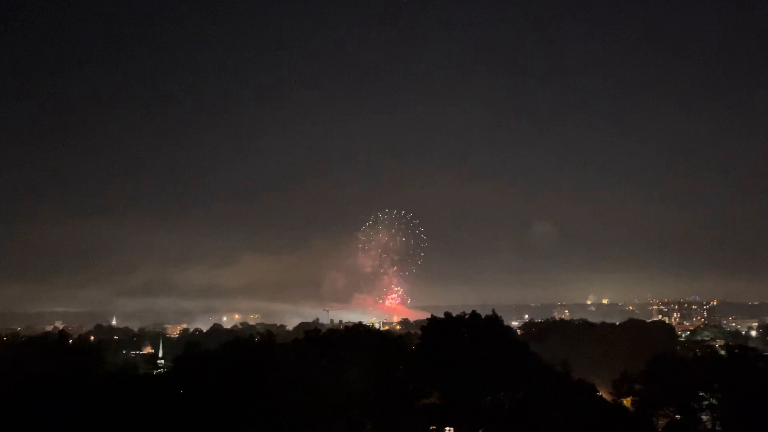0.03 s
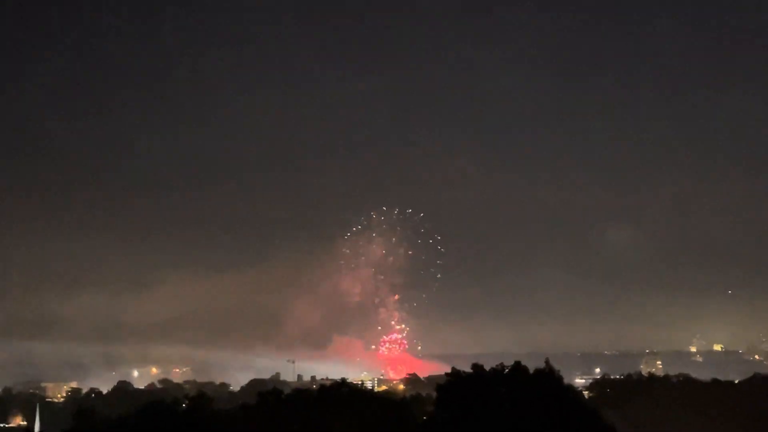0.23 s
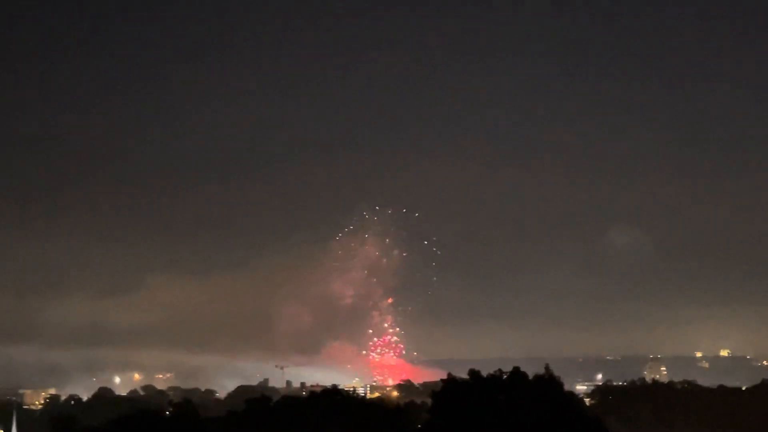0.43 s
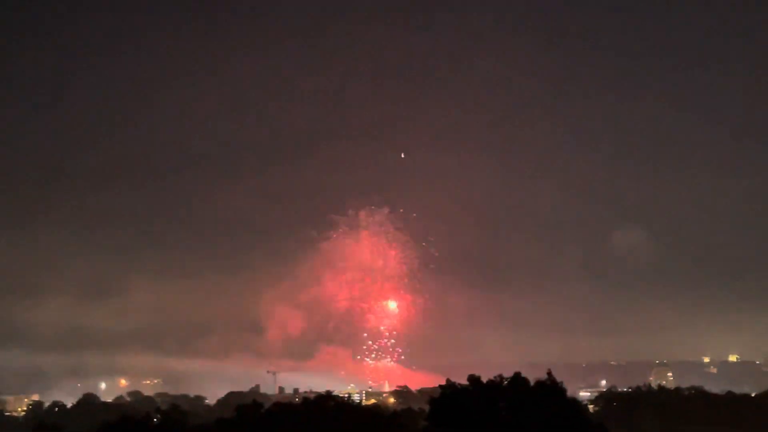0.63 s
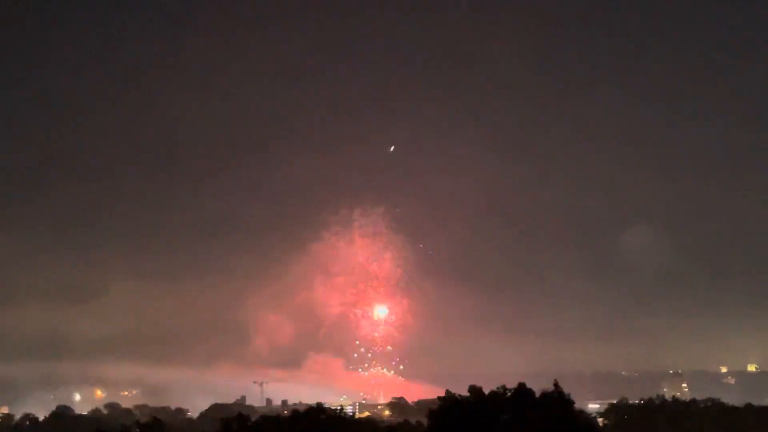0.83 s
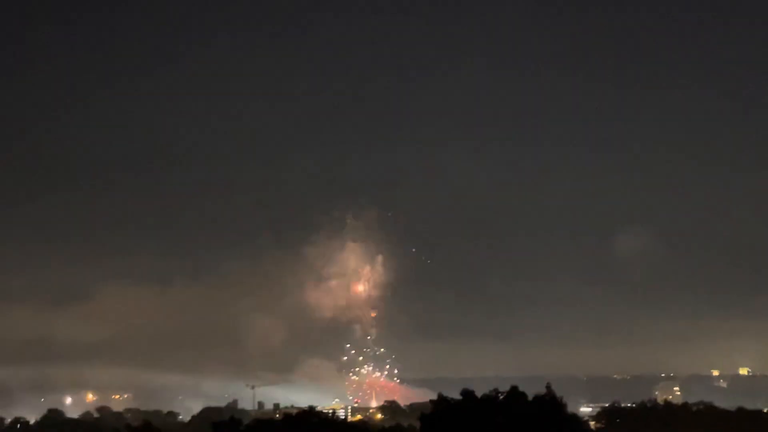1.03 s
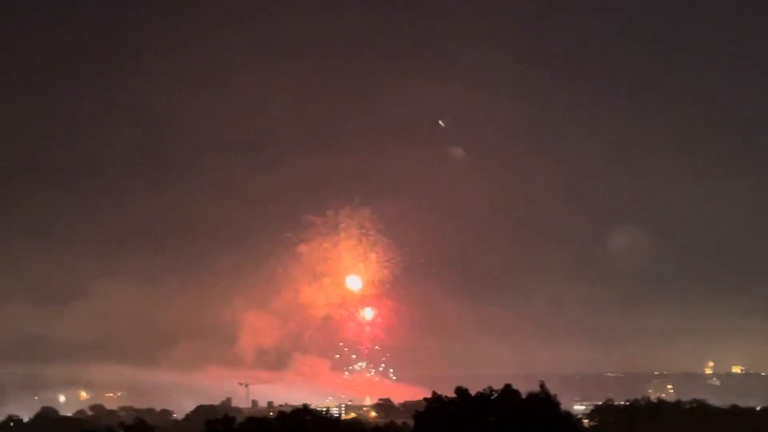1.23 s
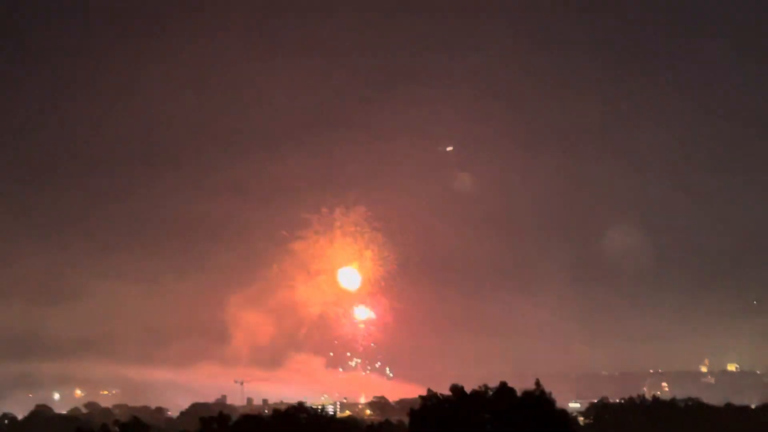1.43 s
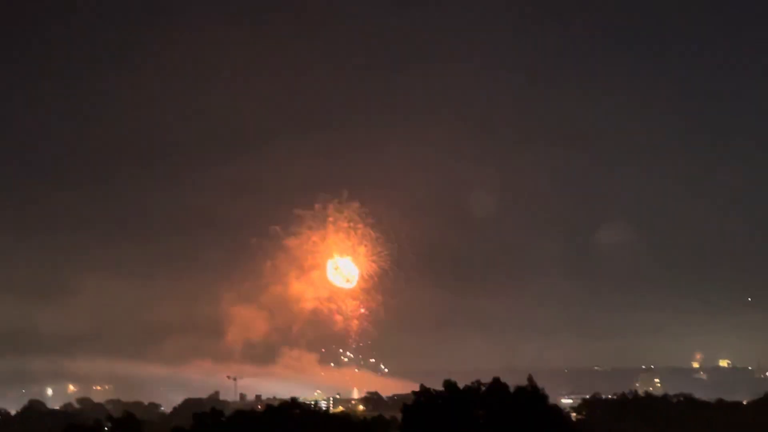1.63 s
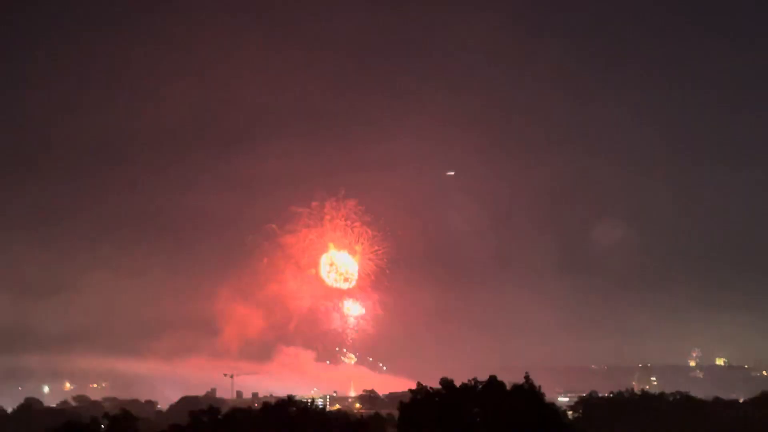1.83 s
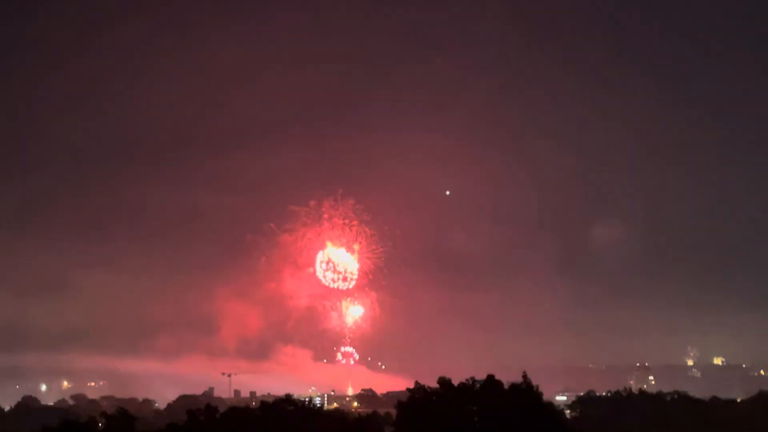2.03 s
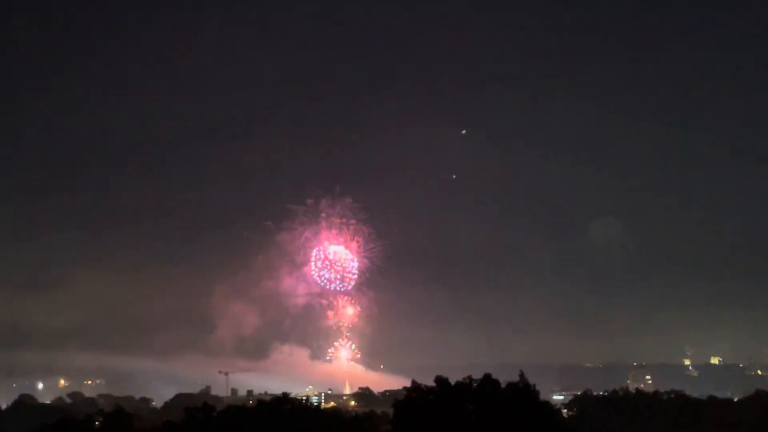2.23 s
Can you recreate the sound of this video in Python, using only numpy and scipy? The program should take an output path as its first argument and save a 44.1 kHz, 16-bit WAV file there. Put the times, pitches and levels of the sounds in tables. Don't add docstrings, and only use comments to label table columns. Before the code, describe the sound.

Distant fireworks outdoors at night: a quiet low rumble, then a rapid cluster of dull bangs, a short gap, one louder blast with quick followers, and deep echoes rolling away. Faint hiss, limited treble, slightly squashed peaks.

```python
import sys
import numpy as np
from scipy import signal
from scipy.fft import rfft, irfft, next_fast_len
from scipy.io import wavfile

SR = 44100
rng = np.random.default_rng(int(sys.argv[2]) if len(sys.argv) > 2 else 0)


def transcribe(signal):
    frames = np.atleast_2d(signal).T
    limited = np.clip(frames, -1, 1)
    pcm = np.round(limited * 32767).astype(np.int16)
    wavfile.write(sys.argv[1], SR, pcm)


def field_ratio(decibels):
    return 10 ** (np.asarray(decibels, dtype=float) / 20)


N = 101165
TIME = np.arange(N) / SR
SIZE = next_fast_len(2 * N)
JW = 2j * np.pi * np.maximum(np.arange(SIZE // 2 + 1), 1e-3) * SR / SIZE
RIGHT_LAG_MS, RIGHT_DB = 0.025, 0.97


def at_hz(points, hz):
    table_hz, level_db = np.transpose(points)[:2]
    return np.interp(np.log(hz), np.log(table_hz), level_db, left=-60, right=-60)


def in_time(rows):
    time_s, level_db = np.transpose(rows)
    return field_ratio(np.interp(TIME, time_s, level_db))


def drift(rate):
    r = np.exp(-80 * np.pi * rate / SR)
    noise = rng.standard_normal(N // 40 + 2002)
    slow = signal.lfilter([1], [1, -2 * r, r * r], noise)[2000:]
    return np.interp(np.arange(N) / 40, np.arange(len(slow)), slow / slow.std())


def band(x, low, high):
    return signal.sosfilt(signal.butter(2, [low, high], "band", fs=SR, output="sos"), x)


def peak(hz, width_hz, db):
    tone, wide = 2 * np.pi * hz, 2 * np.pi * width_hz
    return 1 + field_ratio(db) * wide * JW / (JW ** 2 + wide * JW + tone ** 2)


# pitch_hz, likeness (0 to 1)
LIKENESS = [(60, .985), (140, .93), (310, .7), (500, .2), (1100, .1), (2400, .7), (5500, .5), (10000, .05)]


def banded_noise(spectrum, patchy_db, rate):
    out, together = 0, drift(rate)
    edges = 24 * 2 ** np.arange(0, 9.6, .5)
    white = rng.standard_normal((2, 2, N + 8000))
    like_hz, likeness = np.transpose(LIKENESS)
    for k, (low, high) in enumerate(zip(edges, edges[1:])):
        hz = np.sqrt(low * high)
        if spectrum[0][0] <= hz <= spectrum[-1][0]:
            mid, side = band(white[k % 2], low, high)[:, -N:]
            alike = np.clip(np.interp(np.log(hz), np.log(like_hz), likeness), 0, 1)
            flicker_db = patchy_db * (.7 * together + .7 * drift(rate))
            gain = field_ratio(at_hz(spectrum, hz) + flicker_db)
            out = out + gain * (np.sqrt(1 + alike) * mid + np.sqrt(1 - alike) * side * [[1], [-1]])
    return out / out.std() * field_ratio([[-RIGHT_DB / 2], [RIGHT_DB / 2]])


# lag_ms, left_share, right_share
NEAR = [
    (1.72, -.38, -.43),
    (6.04, .24, .34),
]


def near_reflections():
    bounces = sum(np.outer([left, right], np.exp(-JW * ms / 1000)) for ms, left, right in NEAR)
    dull = 1 + JW / (2 * np.pi * 2500)
    return (1 + bounces / dull) * peak(343, width_hz=70, db=-6)


def direct_path():
    right = field_ratio(RIGHT_DB) * np.exp(-JW * RIGHT_LAG_MS / 1000)
    return near_reflections() * [np.ones_like(JW), right]


def through_recorder(spectrum):
    splitter_hz, mic_low_hz = [155, 294, 813, 3391, 3265], 125
    low = 2 * np.pi * mic_low_hz
    chain = JW ** 2 / (JW ** 2 + np.sqrt(2) * low * JW + low ** 2)
    for w in 2 * np.pi * np.array(splitter_hz):
        bend = np.sqrt(2) * w * JW
        chain = chain * (JW ** 2 - bend + w ** 2) / (JW ** 2 + bend + w ** 2)
    return irfft(spectrum * chain, SIZE)[:, :N]


# time_s, level_db
ROLL = [(.04, -28), (.5, -30), (.75, -29), (1.4, -30), (1.5, -25), (1.6, -24.5), (1.85, -25.5),
        (2.05, -25.5), (2.29, -26.5)]
# pitch_hz, level_db (per Hz)
ROLL_COLOUR = [(15, -48), (25, -18), (66, 5.5), (85, 5.5), (160, -3.5), (200, -1), (314, -24.5), (500, -9),
               (650, -71), (1100, -120)]


def rolling_rumble():
    return in_time(ROLL) * banded_noise(ROLL_COLOUR, patchy_db=1.0, rate=12)


# time_s, level_db
WASH = [(0.04, -32), (0.1, -38.5), (0.41, -40), (0.5, -33), (0.64, -28.5), (0.72, -28), (1.15, -30),
        (1.37, -33), (1.57, -26.5), (1.8, -31.5), (2.29, -32.5)]
# pitch_hz, level_db (per Hz)
WASH_COLOUR = [(88, -25.5), (150, 2), (357, -6), (418, -7), (548, -19.5), (659, -11.5), (888, -15.5),
               (968, -19), (4500, -49.5), (5850, -89), (9900, -120)]


def echo_wash():
    wash = in_time(WASH) * banded_noise(WASH_COLOUR, patchy_db=0.14, rate=23)
    return irfft(rfft(wash, SIZE) * near_reflections(), SIZE)[:, :N]


# time_s, level_db
NIGHT_LEVEL = [(.06, -52.5), (.5, -54.5), (1.0, -58), (1.5, -50.5), (1.7, -51), (2.29, -52.5)]
# pitch_hz, level_db (per Hz)
NIGHT_COLOUR = [(1470, -4), (2500, -11), (5530, -18), (6800, -16), (9210, -30), (10100, -14.5),
                (11200, -29), (12000, -21), (13000, -49)]


def night_hiss():
    return in_time(NIGHT_LEVEL) * banded_noise(NIGHT_COLOUR, patchy_db=.4, rate=8)


def insects():
    pitch_hz, width_hz, level_db, throb_db = 6750, 450, -68, 2.2
    song = band(rng.standard_normal(N), pitch_hz - width_hz / 2, pitch_hz + width_hz / 2)
    return field_ratio(level_db + throb_db * drift(11)) * song / song.std()


def blasts(rows):
    push_gain_db, air_cut_hz = 11.5, 6500
    out = 0
    for start_s, level_db, length_ms, rise_ms in rows:
        push = JW * abs(length_ms) / 1000
        rise = JW * abs(rise_ms) / 1000
        pulse = SR * push ** 2 / JW / (1 + push) ** 2 / (1 + rise) ** 2
        out = out + field_ratio(level_db + push_gain_db) * pulse * np.exp(-JW * start_s)
    return out / (1 + JW / (2 * np.pi * air_cut_hz)) ** 2


# pitch_hz, level_db, t60_s (time to fade by 60 dB)
SCATTER = [(93, -17, 1), (166.7, -11, 0.41), (333, -8.5, 0.24), (697, -13, .35), (1353, -8.5, 0.1),
           (3020, -13, 0.23), (6020, -14, 0.75)]


def town_scatter():
    build_s, lump_db = .003, 1.5
    early_db, early_t60_s = 8, 0.12
    out = 0
    mid, side = rng.standard_normal((2, N))
    lumps = field_ratio(lump_db * drift(63)) * (1 - np.exp(-TIME / build_s)) ** 2
    early = field_ratio(early_db - 60 * TIME / early_t60_s)
    for hz, level_db, t60_s in SCATTER:
        wide = min(hz / 900, .6)
        ears = band(np.array([mid + wide * side, mid - wide * side]), hz / np.sqrt(2), hz * np.sqrt(2))
        out = out + field_ratio(level_db - 24) * (field_ratio(-60 * TIME / t60_s) + early) * ears
    return out * lumps


# start_s, level_db (peak), length_ms (push), rise_ms (front)
POPS = [(0.289, -23.5, 0.37, 0.2), (0.4202, -24.5, 0.79, 0.08), (0.5169, -18, .9, 0.4),
        (0.9398, -11, 0.33, 0.46), (1.0875, -25, 0.32, 0.075), (1.47, -20, 2.9, .15),
        (1.5063, -22.5, 0.54, 0.073), (1.6839, -16, 1.2, 0.16), (1.747, -17.5, 1.7, 0.56),
        (1.899, -21, 1.3, 0.95), (2.1544, -32, 0.3, 0.11), (2.2365, -28, 0.31, 0.12)]
# start_s, level_db (peak), length_ms (push), rise_ms (front), crack_db (ragged front)
BURSTS = [(0.471, -1.5, 1.08, 0.34, -30), (0.4915, -4.5, .9, 0.2, -30), (0.5718, -3.5, 2.3, 0.15, -35),
          (0.5836, -12.5, 1.1, 0.33, -32), (.6298, -2, 1.02, 0.15, -31), (0.6534, -4, 1.16, 0.26, -32.5),
          (.7520, 0, 1.02, 0.67, -32.5), (0.7762, -6, 2.4, 0.092, -42), (.8050, -3.5, 0.71, 0.39, -32),
          (0.8786, -0.5, 0.78, 0.27, -22.5), (1.0302, -4.5, 1.17, 0.12, -17.5),
          (1.3757, 4, 0.72, 0.44, -29.5), (1.4139, -6, 1.8, 0.1, -33), (1.4261, -2, 0.89, 0.23, -26.5),
          (1.4467, -1, 12, 0.074, -30)]


def shells():
    rows = [row[:4] for row in BURSTS] + POPS
    out = 0
    for k in range(3):
        out = out + blasts(rows[k::3]) * (direct_path() + rfft(town_scatter(), SIZE))
    return through_recorder(out)


def cracks():
    crack_s, tail_s, tail_db = .0012, 0.015, -10.5
    low_hz, high_hz = 900, 4000
    out, t = np.zeros((2, N)), np.arange(SR // 10) / SR
    shape = np.exp(-t / crack_s) + field_ratio(tail_db) * np.exp(-t / tail_s)
    for start_s, _, _, _, crack_db in BURSTS:
        mid, side = rng.standard_normal((2, len(t)))
        start = int(start_s * SR)
        out[:, start:start + len(t)] += field_ratio(crack_db + 4) * shape * (mid + .3 * side * [[1], [-1]])
    bright = band(band(out + 1e-18, low_hz, high_hz), low_hz, high_hz)
    return through_recorder(rfft(bright, SIZE))


# time_s, level_db
RUSTLE = [(1.45, -61.5), (1.54, -53), (1.55, -42), (1.58, -47.5), (1.63, -56), (1.75, -121)]
# pitch_hz, level_db (per Hz)
RUSTLE_COLOUR = [(2350, -44), (4000, -15), (4680, -19), (8060, -17), (10200, -16.5), (11200, -28),
                 (13000, -25)]


def rustle():
    return in_time(RUSTLE) * banded_noise(RUSTLE_COLOUR, patchy_db=1.5, rate=83)


# middle_s, level_db, half_width_s
SWELLS = [
    (1.56, -41, 0.055),
    (1.687, -39, 0.015),
    (2.0, -43, 0.059),
]


def swells():
    shape = sum(field_ratio(db) * np.exp(-((TIME - s) / width) ** 2) for s, db, width in SWELLS)
    air = band(rng.standard_normal((2, N)), 600, 2407)
    return shape * air / air.std()


# start_s, level_db (peak), length_ms (push), rise_ms (front)
HILL_SLAPS = [
    (1.512, -11, 5.8, 1.1),
    (1.546, -13, 6.1, 1.5),
    (1.572, -5.5, 3.0, 2.1),
    (1.629, -9, 4.9, 1.7),
    (1.679, -14, 6, 0.63),
    (1.703, -10.5, 7.1, 0.7),
    (1.764, -9, 2.5, 2.1),
    (1.856, -6, 4.1, 3),
    (1.937, -3.5, 9, 2.7),
    (1.999, -15, 7.5, 0.57),
]


def hill_slaps():
    valley = peak(83, width_hz=22, db=14)
    return through_recorder(blasts(HILL_SLAPS) * valley * direct_path())


def scene():
    background = rolling_rumble() + echo_wash() + night_hiss() + insects()
    fireworks = shells() + cracks() + swells() + hill_slaps()
    return background + fireworks + rustle()


def lose_band_and_top(part, gap_hz, cut_hz):
    part = signal.sosfilt(signal.cheby2(5, 30, gap_hz, "bandstop", fs=SR, output="sos"), part)
    return signal.sosfilt(signal.cheby2(12, 50, cut_hz * 1.03, fs=SR, output="sos"), part)


def low_pass(x):
    return signal.sosfilt(signal.butter(12, 13190, fs=SR, output="sos"), x)


def record(dry):
    top, start_s, tick_db = .97, .0354, -42
    x = top * np.tanh(dry / top)
    centre = lose_band_and_top((x[0] + x[1]) / 2, [9800, 10650], 12040)
    width = lose_band_and_top((x[0] - x[1]) / 2, [5000, 9000], 11500)
    x = np.array([centre + width, centre - width]) * (np.arange(N) >= start_s * SR)
    x[:, int(start_s * SR)] += field_ratio(tick_db)
    return low_pass(x)


dry = scene()
out = record(dry)
transcribe(out)
```